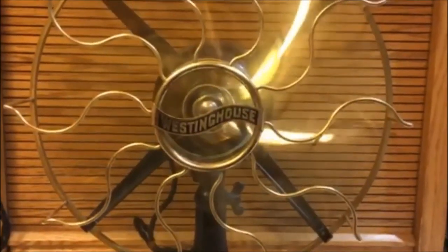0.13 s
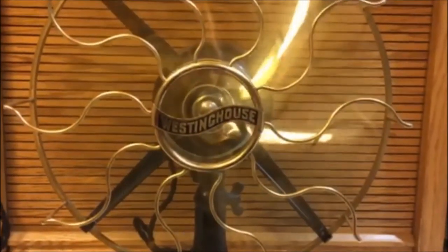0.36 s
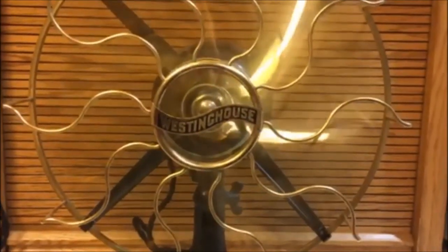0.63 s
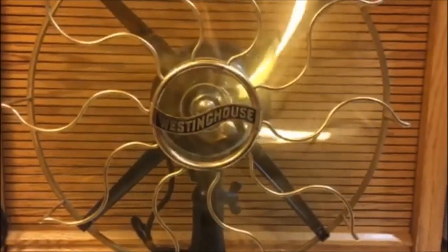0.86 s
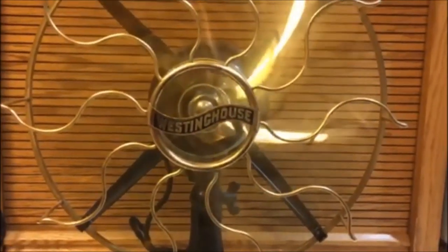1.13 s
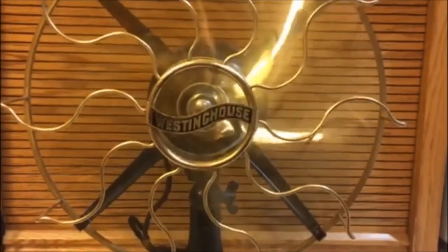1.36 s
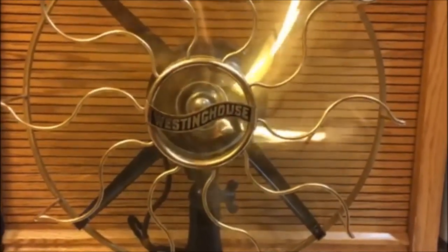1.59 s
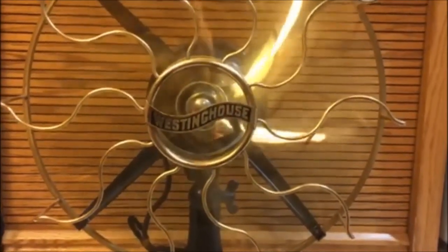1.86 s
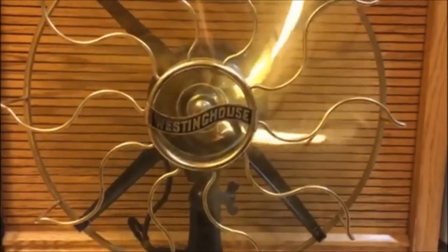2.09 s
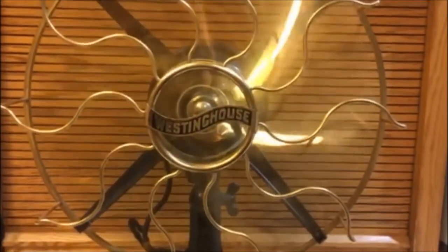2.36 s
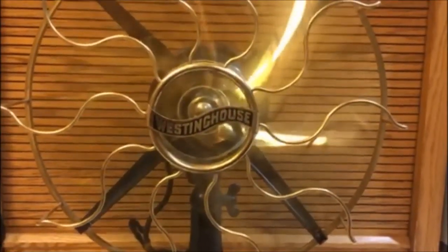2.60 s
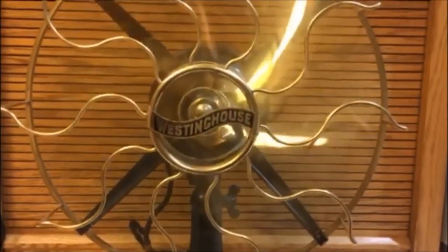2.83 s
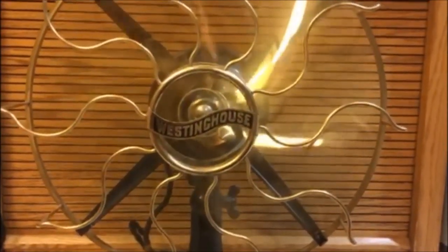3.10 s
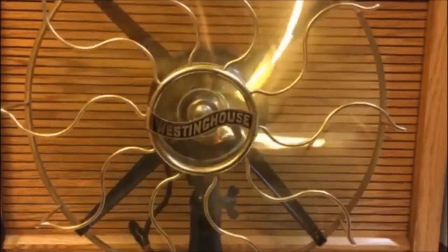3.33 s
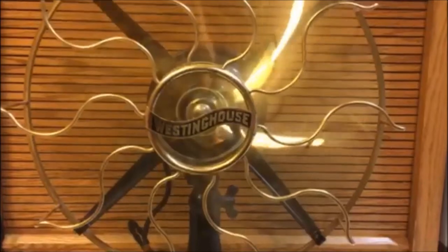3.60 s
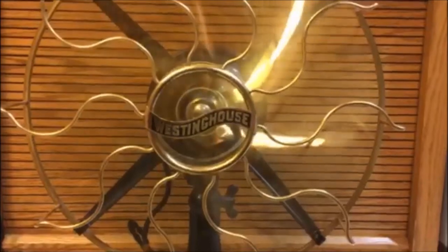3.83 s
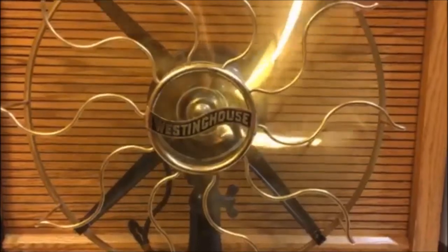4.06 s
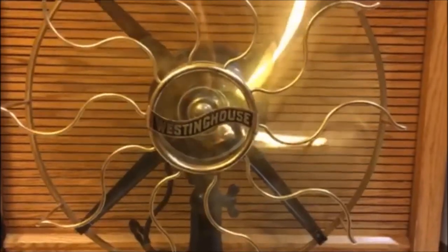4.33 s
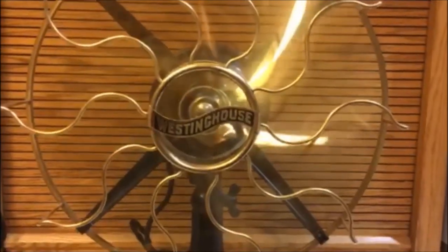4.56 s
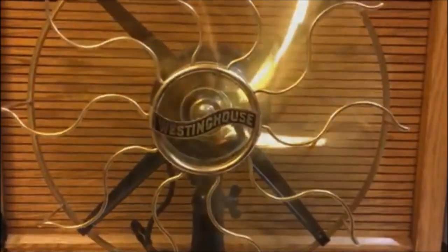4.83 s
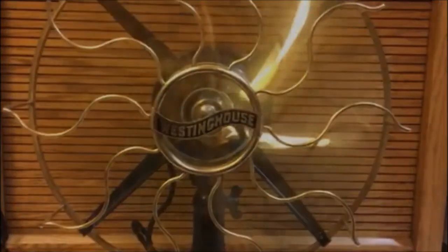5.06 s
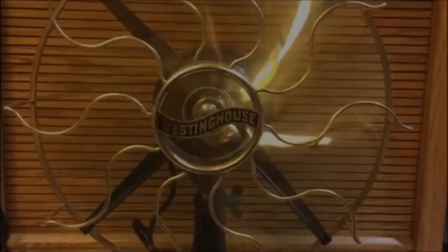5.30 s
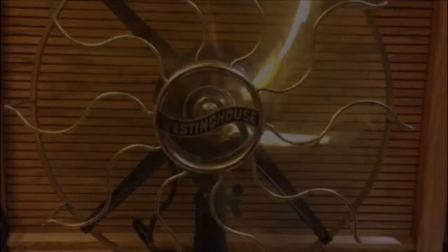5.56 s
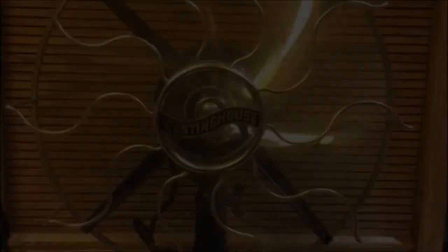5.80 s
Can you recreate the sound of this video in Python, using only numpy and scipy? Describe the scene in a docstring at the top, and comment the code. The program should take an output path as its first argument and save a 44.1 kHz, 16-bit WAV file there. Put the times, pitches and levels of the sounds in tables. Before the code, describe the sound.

Steady fan hum and breathy mid-range hiss continue from start to end, without starting or stopping. Over them, wind from the blades flaps and bumps against the microphone in uneven bursts, the hardest around two and a half seconds, briefly pulling the level down. The second half fades gradually but not to silence. Close, dry, single-channel indoor pickup.

```python
"""Desk fan with wind buffeting

A fan at nearly steady speed: its blades sing a comb of sines at multiples of the blade rate over a rush of
filtered noise. The air stream buffets the microphone with a lumpy noise rumble and short, sinking eddy pulses.
Gain control ducks after the hardest thumps; a straight fade over the second half stops short of silence.
"""
import sys
import numpy as np
from scipy import signal
from scipy.fft import rfft, irfft
from scipy.io import wavfile
from scipy.ndimage import uniform_filter1d

SR = 44100
rng = np.random.default_rng(int(sys.argv[2]) if len(sys.argv) > 2 else 0)


def master_out(mix):
    """Clip the mix to full scale and print it as 16-bit PCM to the path in sys.argv[1]."""
    frames = np.transpose(np.atleast_2d(mix))
    ceiling = np.clip(frames, -1, 1)
    pcm = np.round(ceiling * 32767).astype(np.int16)
    wavfile.write(sys.argv[1], SR, pcm)


def nominal_scale(level):
    """Amplitude ratio for a level in decibels (scalar or array-like)."""
    x = np.asarray(level, float) / 20
    return 10 ** x


N = 261513
PUSH_HZ = 70.3  # pitch of the low push behind each hard eddy

# fan speed: t/s, blade rate f/Hz
BLADE_RATE = [(0, 108.46), (1.3, 108.46), (1.6, 108.27), (4.3, 108.27), (4.6, 108.85), (5.93, 108.85)]


def rms_one(x):
    """Scales a signal to rms 1."""
    return x / np.sqrt(np.mean(x ** 2) + 1e-20)


def in_time(rows):
    """Columns of a table after t/s, joined by straight lines, one value a sample."""
    t_s, *columns = np.transpose(rows)
    return [np.interp(np.arange(N) / SR, t_s, column) for column in columns]


def drift(corner_hz):
    """Slow chance: noise at every 40th sample through a double one-pole low-pass; spread 1."""
    pole = np.exp(-2 * np.pi * corner_hz * 40 / SR)
    noise = rng.standard_normal(N // 40 + 2002)
    slow = signal.lfilter([1], [1, -2 * pole, pole * pole], noise)[2000:]  # skip run-in
    return np.interp(np.arange(N) / 40, np.arange(len(slow)), rms_one(slow))


def coloured_bands(spectrum, centres_hz):
    """Noise of the given spectrum, split into overlapping bands; their sum has rms 1."""
    log_hz = np.log(np.fft.rfftfreq(N, 1 / SR) + 1)
    f_hz, level_db = np.transpose(spectrum)
    shaped = rfft(rng.standard_normal(N)) * nominal_scale(np.interp(log_hz, np.log(f_hz), level_db))
    shaped = shaped / np.std(irfft(shaped, N))
    shares = [np.interp(log_hz, np.log(centres_hz), row) for row in np.eye(len(centres_hz))]
    return [irfft(shaped * share, N) for share in shares]


def blade_phase():
    """Phase of the blade rate in radians: the running sum of the fan speed."""
    return 2 * np.pi * np.cumsum(in_time(BLADE_RATE)[0]) / SR


def blade_tones():
    """Multiples of the blade rate; each wavers in level and phase as eddies cross the blades."""
    # tones with a drawn swell: t/s, then level/dB (rms) of each swelling order
    swell = [(0.0, -39.5, -50, -49), (0.5, -39.5, -47.5, -51.5), (0.88, -39.5, -54.5, -51.5),
             (1.25, -35, -44.5, -52), (1.75, -46, -48.5, -57), (2.25, -39, -47, -52.5),
             (2.75, -42.5, -51, -48.5), (3.25, -40, -52, -47), (3.6, -41, -48, -50),
             (4.25, -41.5, -50, -51), (4.45, -41, -50.5, -49.5), (4.699, -47, -50.5, -51.5),
             (5.2, -40, -46.5, -47.5), (5.9, -38.5, -48, -53)]
    # their multiples of the blade rate
    swelling_orders = (3, 5, 10)
    # other tones, held around a mean level: multiple of the blade rate: level/dB (rms)
    level_orders = {1: -49, 2: -46, 4: -58, 6: -67.5, 7: -60, 8: -62.5, 9: -59, 12: -59, 13: -61, 15: -58.5,
                    16: -58.5, 17: -60.5}
    phase = blade_phase()
    out = 0
    for order, level_db in zip(swelling_orders, in_time(swell)):
        waver_db = 1.8 * drift(4)
        wander = 0.068 * order * drift(6.4)
        out = out + nominal_scale(level_db + waver_db) * np.sin(order * phase + wander + rng.uniform(0, 2 * np.pi))
    for order, level_db in level_orders.items():
        waver_db = 3.16 * drift(3.54)
        wander = 0.11 * order * drift(5.4)
        out = out + nominal_scale(level_db + waver_db) * np.sin(order * phase + wander + rng.uniform(0, 2 * np.pi))
    return np.sqrt(2) * out  # sine amplitude from rms


def rush():
    """Air through blades and cage: hiss whose bands breathe a little, throbbing faintly at the blade rate."""
    # colour of the rush: f/Hz, relative density level/dB
    spectrum = [(200, -9.5), (600, -10.5), (910, -9), (1100, -3.5), (1400, -2.5), (1520, -7), (2020, -7.5),
                (2250, -3.5), (2450, -7.5), (2540, -13), (2770, -9.5), (2900, -13.5), (3600, -18.5),
                (4300, -23), (4900, -29.5), (5350, -25.5), (6800, -27), (8500, -33.5), (10400, -39.5),
                (11200, -36), (13400, -37.5), (15600, -41)]
    together = drift(3.3)
    bands = coloured_bands(spectrum, [500, 900, 1400, 2200, 3500, 6000, 11000])
    breath_depth = [.9, .9, .8, .7, .5, .3, .2]
    hiss = 0
    for band, depth in zip(bands, breath_depth):
        breath_db = depth * (0.37 * together + drift(6.1))
        hiss = hiss + band * nominal_scale(breath_db)
    throb = 1 + .04 * np.sin(blade_phase())
    return nominal_scale(-42) * hiss * throb


def wake(rows):
    """Each eddy stirs the air about it: power swells just ahead of the thump and dies after it."""
    lead_s, decay_s = .008, 0.011
    kick_db, kick_db_per_octave = 22.5, 2  # sharper eddies stir more
    t_s, peak_db, f_hz = np.transpose(rows)
    kick = nominal_scale(peak_db + kick_db + kick_db_per_octave * np.log2(f_hz / PUSH_HZ)) ** 2
    kicks = np.zeros(N)
    np.add.at(kicks, ((t_s - lead_s) * SR).astype(int), kick)
    stirred = signal.lfilter([1], [1, -np.exp(-1 / (decay_s * SR))], kicks)
    return uniform_filter1d(stirred, size=300)  # soft onset


def rumble(rows):
    """Turbulent pressure on the microphone: noise bands lifted by gusts, lumps, flutter and eddy wakes."""
    # air stream: t/s, rumble level/dB before lumps, flutter and wakes
    gust = [(0.1, -27.5), (0.45, -26.5), (0.7, -27), (1.1, -29), (1.36, -32), (1.55, -24), (1.87, -30),
            (2.04, -28), (2.3, -34), (2.55, -29.5), (2.89, -26.5), (3.2, -34), (3.4, -26.5), (3.9, -27.5),
            (4.1, -27), (4.75, -28), (5.27, -25.5), (5.45, -30.5), (5.7, -27.5)]
    # rumble colour: f/Hz, relative density level/dB
    spectrum = [(12, -28), (25, -58), (40, -3), (60, 0), (105, -6.5), (190, -14.5), (310, -25),
                (520, -38.5), (810, -43), (1500, -64)]
    # slow flutter trend: t/s, level/dB before each band's share
    flutter = [(0, -1.5), (0.7, -4), (1.4, -1.5), (2.4, -1), (3.5, -0.5), (4.6, -2), (5.1, -1.5),
               (5.5, 5.5), (5.9, 0.5)]
    gust_db, = in_time(gust)
    flutter_db = in_time(flutter)[0] + 1.01 * drift(3.5)
    lumps, stirred = drift(20.6), wake(rows)
    bands = coloured_bands(spectrum, [40, 90, 180, 330, 600])
    # per band, low to high
    flutter_share = [0, .2, 1, 1.2, 1.2]
    wake_share = [.1, .3, 1.73, 1.3, 2.3]
    lumpiness = [1.2, 2.4, 4, 5.2, 4.7]
    out = 0
    for band, share, stir, lumpy in zip(bands, flutter_share, wake_share, lumpiness):
        lumps_db = lumpy * (0.65 * lumps + 0.36 * drift(38))
        level_db = gust_db + share * flutter_db + lumps_db
        out = out + band * nominal_scale(level_db) * np.sqrt(1 + stir * stirred)
    return signal.sosfilt(signal.butter(4, 1300, fs=SR, output="sos"), out)


def small_eddies():
    """Rows t/s, peak/dB, f/Hz of small eddies: chance gaps, exponential spread of level, log-even pitch."""
    per_s, floor_db, mean_excess_db, low_hz, high_hz = 6, -30.5, 2.0, 140, 340
    gap, size, pitch = rng.random((80, 3)).T
    t_s = np.cumsum(-np.log(1 - gap)) / per_s + .05
    peak_db = floor_db - mean_excess_db * np.log(1 - size)
    f_hz = low_hz * (high_hz / low_hz) ** pitch
    return np.c_[t_s, peak_db, f_hz][t_s < (N - 1) / SR]


def all_eddies():
    """Rows t/s, peak/dB, f/Hz: each hard eddy tumbles from edge and snap through body to push; plus small ones."""
    # hardest eddies: t/s, snap peak level/dB, snap f/Hz, push peak level/dB
    hard = [(0.473, -23, 267, -34), (0.572, -37, 159, -17), (0.969, -43, 157, -16), (1.47, -20.5, 513, -15),
            (1.488, -15.5, 241, -22), (1.659, -13.5, 193, -15.5), (1.721, -29, 195, -30),
            (2.08, -22, 156, -30), (2.283, -16.5, 175, -31), (2.438, -10, 260, -16.5),
            (2.472, -20, 270, -22), (2.677, -29, 240, -25), (2.749, -19.5, 160, -25),
            (2.831, -22, 161, -29), (2.939, -30, 200, -21), (3.151, -22.5, 268, -18.5),
            (3.205, -20.5, 273, -16.5), (3.328, -26.5, 413, -28), (3.402, -23.5, 286, -22),
            (3.497, -22.5, 140, -39), (3.887, -23, 194, -28), (4.067, -20.5, 280, -32),
            (4.097, -27, 400, -15.5), (4.245, -25, 373, -28), (4.329, -19.5, 213, -30),
            (4.503, -23.5, 286, -34), (4.758, -21.5, 274, -24), (4.794, -25.5, 240, -14),
            (5.187, -22.5, 300, -17), (5.21, -18, 546, -45), (5.327, -17, 340, -39),
            (5.353, -22.5, 332, -30), (5.378, -18.5, 315, -25), (5.427, -26, 330, -30),
            (5.448, -20, 395, -24), (5.621, -16.5, 380, -31), (5.878, -14.5, 233, -20)]
    body_lag_s, push_lag_s = 0.0029, 0.0091
    t_s, snap_db, snap_hz, push_db = np.transpose(hard)
    edge = np.c_[t_s, snap_db - 18, 2 * snap_hz]
    snap = np.c_[t_s, snap_db, snap_hz]
    # body: between snap and push in time and pitch, below their mean level
    body = np.c_[t_s + body_lag_s, (snap_db + push_db) / 2 - 2.5, np.sqrt(snap_hz * PUSH_HZ)]
    push = np.c_[t_s + push_lag_s, push_db, np.full(len(t_s), PUSH_HZ)]
    return np.r_[edge, snap, body, push, small_eddies()]


def eddies(rows):
    """Each eddy is a Gaussian pulse of a cycle or two whose pitch sinks as it passes."""
    width_cycles, sink_per_cycle = 0.55, 0.16
    out = np.zeros(N)
    for t_s, peak_db, f_hz in rows:
        reach = int(4 * width_cycles / f_hz * SR)
        at = np.arange(round(t_s * SR) - reach, round(t_s * SR) + reach)
        at = at[at < N]
        cycles = (at / SR - t_s) * f_hz
        envelope = np.exp(-.5 * (cycles / width_cycles) ** 2)
        sunk_cycles = cycles - sink_per_cycle * cycles ** 2 / 2
        out[at] += nominal_scale(peak_db) * envelope * np.cos(2 * np.pi * sunk_cycles + rng.uniform(0, 2 * np.pi))
    return out


def scene():
    """Fan sound through the air plus wind on the microphone."""
    rows = all_eddies()
    return (blade_tones() + rush() + rumble(rows) + eddies(rows))[None]


def gain_control(x, knee_db=-14, ratio=.3, release_db_per_s=12):
    """Peaks over the knee pull the gain down within milliseconds; it recovers at a steady rate."""
    climb_db = release_db_per_s * np.arange(N) / SR
    cut_db = ratio * np.maximum(20 * np.log10(np.abs(x[0]) + 1e-9) - knee_db, 0)
    held_db = np.maximum(np.maximum.accumulate(cut_db + climb_db) - climb_db, 0)
    return x * nominal_scale(-signal.lfilter([.004], [1, -.996], held_db))  # smoothed over 250 samples


def top_cut(x):
    """Nothing passes above the cut-off."""
    return signal.sosfilt(signal.butter(12, 15710, fs=SR, output="sos"), x)


def record(dry):
    """Low cut, gain control and a straight fade-out that the end of the sound cuts short."""
    fade_from_s, fade_to_s = 3.07, 6.36
    x = signal.sosfilt(signal.butter(2, 22, "high", fs=SR, output="sos"), dry)
    fade = np.clip((fade_to_s - np.arange(N) / SR) / (fade_to_s - fade_from_s), 0, 1)
    return top_cut(gain_control(x) * fade)


dry = scene()
out = record(dry)
master_out(out)
```